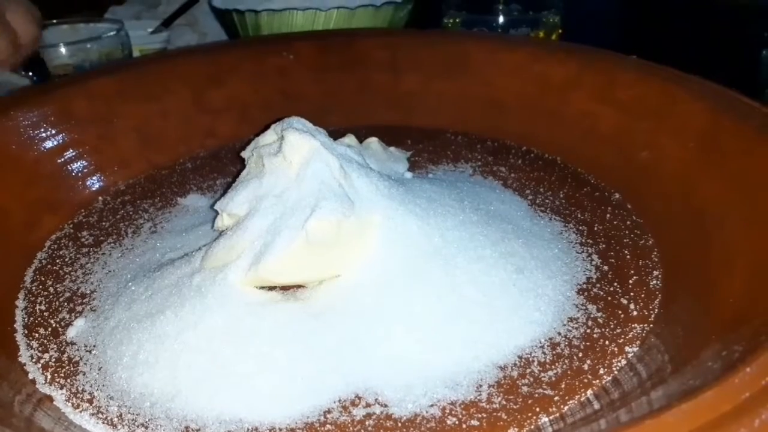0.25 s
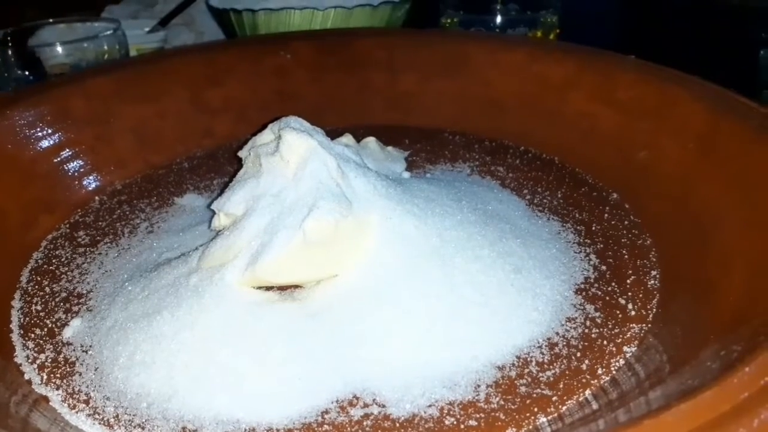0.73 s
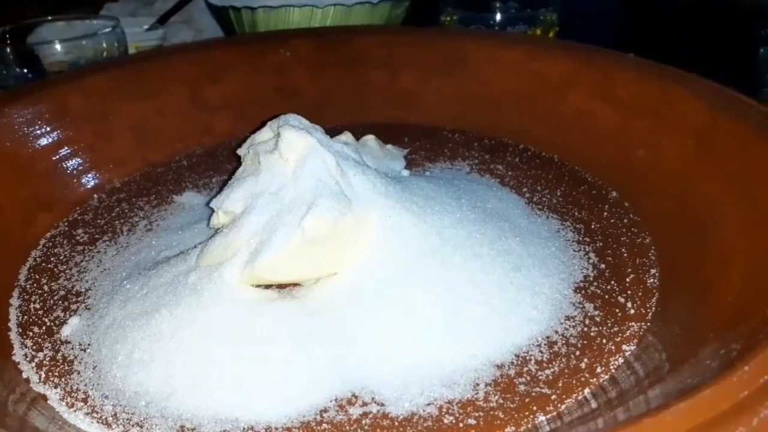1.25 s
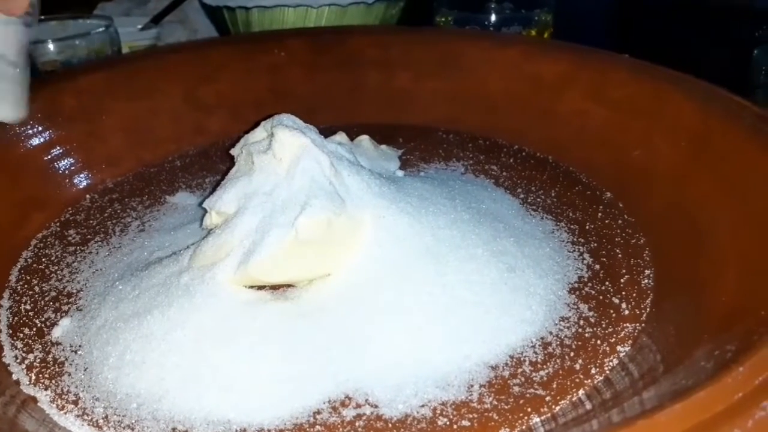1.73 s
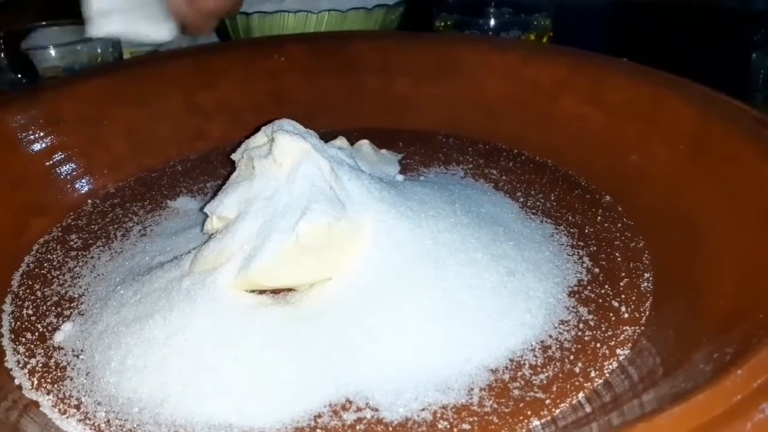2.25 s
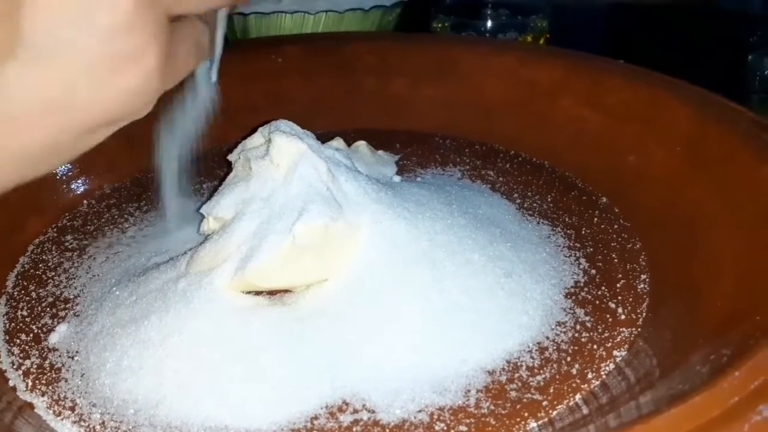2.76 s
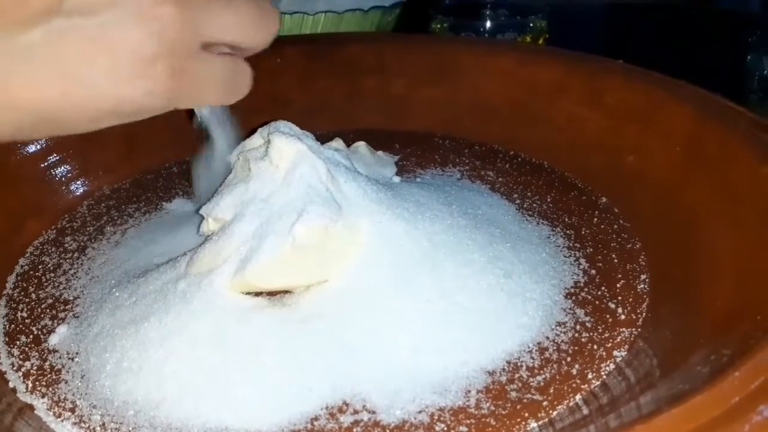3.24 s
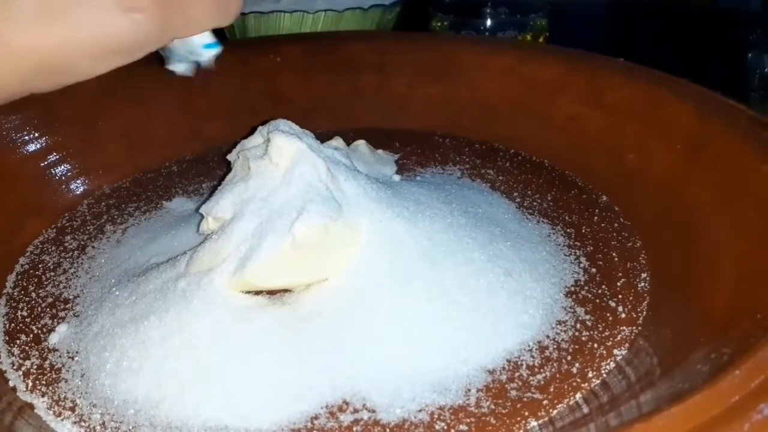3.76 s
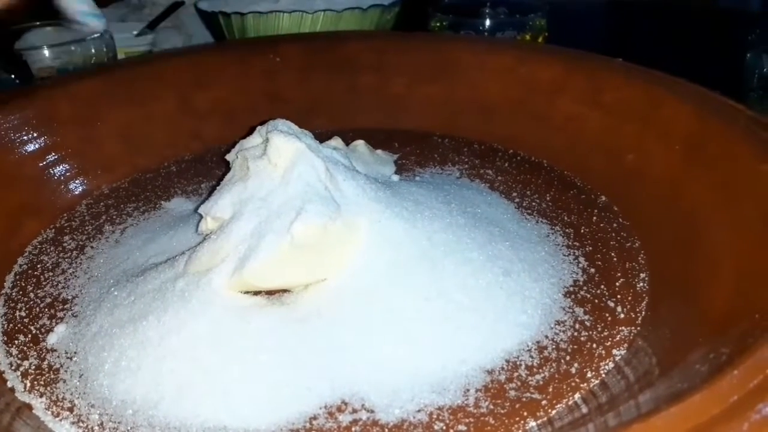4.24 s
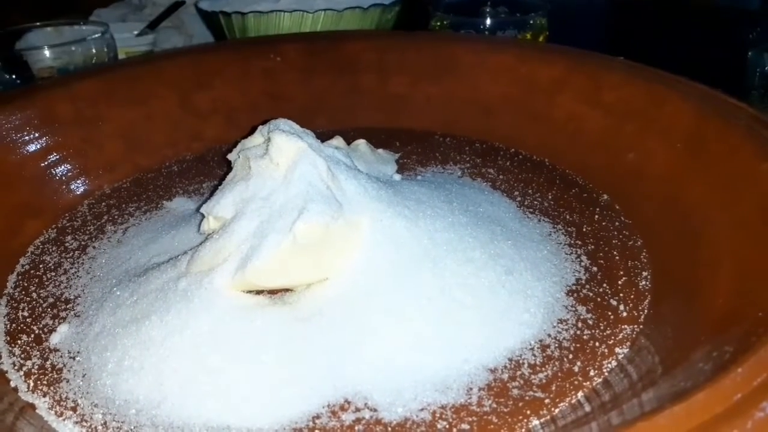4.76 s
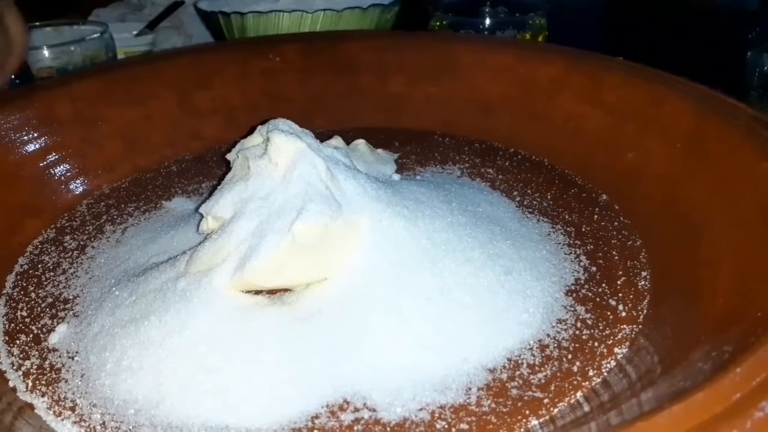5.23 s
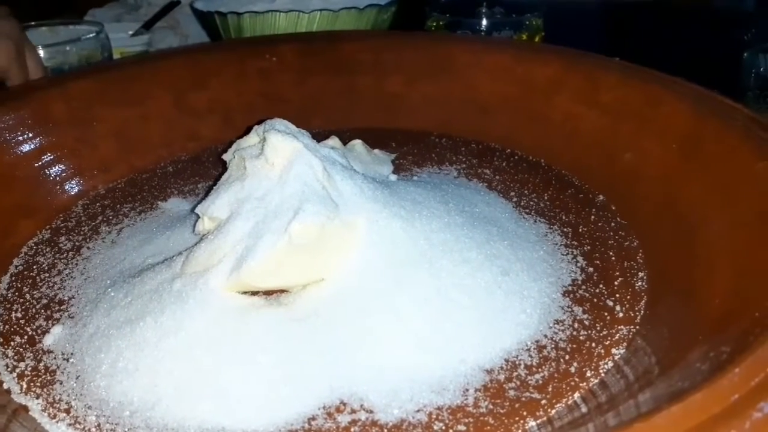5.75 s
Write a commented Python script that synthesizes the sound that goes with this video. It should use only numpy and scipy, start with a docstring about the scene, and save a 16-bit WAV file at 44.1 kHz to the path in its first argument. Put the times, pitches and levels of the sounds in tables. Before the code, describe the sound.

Small paper packets are crumpled, torn and shaken close up with sharp crackles, and powder briefly hisses out in a quiet kitchen.

```python
"""A dull rumble and a soft rustle, then sharp crackles: hands crumple, tear and shake small paper
sachets close to a phone's two microphone ports in a quiet kitchen. Breaking fibres make the rustle,
flipping creases snap, fingers knock the sachet, and midway powder hisses out over the paper.
The rumble comes and goes across the room, a faint scrape passes late, and the room rings briefly."""
import sys
import numpy as np
from scipy import signal
from scipy.io import wavfile
from scipy.ndimage import uniform_filter1d

SR = 44100
rng = np.random.default_rng(int(sys.argv[2]) if len(sys.argv) > 2 else 0)


def dump(signal):
    """Clip the signal to [-1, 1] and save it as 16-bit WAV at the path in sys.argv[1]."""
    limited = np.clip(np.atleast_2d(signal).T, -1, 1)
    pcm = np.round(limited * 32767).astype(np.int16)
    wavfile.write(sys.argv[1], SR, pcm)


N = 264149

# spectrum of the still kitchen: frequency_hz, relative_db
ROOM_TONE = [(35, -71), (60, -38), (164, 1), (323, 6.5), (822, -7.5), (2050, -3), (3500, -15), (7940, -5),
             (9790, -16), (14900, -11), (16000, -54)]
# decay of the kitchen's echoes: frequency_hz, t60_s
ROOM_DECAY = [(200, 0.22), (1000, 0.26), (3000, 0.38), (8000, 0.14), (16000, 0.05)]
# dull rumble from across the room: time_s, level_db, centre_hz, throb_db
RUMBLE = [(0.0, -59.5, 174, -73), (.15, -67, 158, -78), (.22, -82.5, 168, -84), (1.9, -79, 330, -89),
          (2.14, -59.5, 331, -80), (2.4, -78, 323, -93), (3.2, -78.5, 260, -83), (3.53, -63, 241, -77),
          (3.66, -64, 290, -83.5), (3.84, -59.5, 312, -83), (3.98, -84, 305, -92), (4.24, -74, 264, -77),
          (4.388, -61, 190, -79), (4.45, -71, 236, -94), (4.568, -65, 235, -78), (4.642, -57.5, 178, -79),
          (4.698, -59, 173, -76), (4.736, -51, 175, -95), (4.872, -56.5, 156, -70),
          (4.895, -61, 167.5, -82), (4.952, -53.5, 191, -83), (5.006, -56, 170, -55.5),
          (5.12, -73.5, 172, -71.5), (5.31, -93, 172, -78.5), (5.47, -87, 276, -83.5),
          (5.634, -56.5, 360, -77), (5.762, -74, 336, -77.5), (5.99, -75.5, 285, -91)]
# a faint narrow scrape: time_s, level_db
SCRAPE = [(4.35, -63), (4.458, -75), (4.482, -68), (4.638, -80), (4.758, -80), (4.8, -83)]
# powder running out: time_s, level_db
POURING = [(2.3, -91), (2.424, -82), (2.65, -54.5), (2.756, -59.5), (3.252, -54), (3.362, -57),
           (3.426, -58), (3.624, -87), (3.75, -69)]
# spectrum of the sliding grains: frequency_hz, relative_db
POWDER_COLOUR = [(880, -51), (1500, -14), (1850, -6), (2160, -23), (2370, -14), (4160, -6.5), (5380, -8),
                 (8000, -3), (9950, -9.5), (12500, -5), (16000, -14)]
# fingers knocking the sachet: start_s, level_db, pitch_hz
KNOCKS = [(.038, -51.5, 325), (.543, -54, 600), (.795, -55, 686), (1.188, -41.5, 1210),
          (1.364, -44.5, 1170), (1.627, -45.5, 1120), (1.867, -32, 1113), (1.966, -37.5, 380),
          (2.042, -41, 367), (2.053, -29, 446), (2.07, -33, 356), (3.056, -45.5, 1160), (3.302, -53, 332),
          (3.357, -51, 323), (3.389, -52, 436), (3.574, -45.5, 725), (3.631, -47.5, 322), (3.812, -51, 330),
          (3.849, -30.5, 1196), (4.052, -49.5, 453), (4.159, -64, 820), (4.49, -41.5, 420),
          (4.963, -42, 283), (5.598, -51.5, 314), (5.692, -52, 350)]
# colour of paper and microphone: frequency_hz, relative_db
PAPER_COLOUR = [(180, -33), (300, -3), (343, -1), (856, -7), (1140, -3), (1550, -6), (2100, -3), (3080, -3),
                (3580, -7), (4230, -2), (5340, -10), (7800, -5), (9390, -14), (12700, -8), (16000, -16)]
# how much later the right port hears each spot of the paper: delay_samples
PORT_DELAYS = [9, 11, 12, 13, 14, 16]
# moves of the hands: peak_s, effort_db, swell_s, fade_s, flap_over_effort_db, fizz_over_effort_db
HAND_MOVES = [(0.05, -73, 0.049, 0.25, 1, -4.5), (.234, -61.5, 0.022, 0.9, -26, -2.5),
              (.32, -59, 0.076, 0.14, -0.5, -22), (.53, -60, 0.12, 0.094, -7, -5),
              (.606, -63, 0.089, 0.2, 1, -4.5), (.72, -66.5, 0.27, 0.11, -3, -7.5),
              (.805, -64.5, 0.016, 0.097, 3, 0), (.888, -87, 0.11, .1, -2, 8),
              (1.146, -52.5, .003, 0.11, -6.5, -6), (1.2, -63, .04, .12, -2.5, -2),
              (1.335, -59.5, 0.025, 0.13, -5, -7), (1.368, -56, .015, 0.11, -5.5, -7),
              (1.53, -71.5, 0.048, 0.12, 3, 1), (1.632, -60, 0.026, .16, -2.5, -5),
              (1.736, -58, 0.0082, 0.061, -15, -10), (1.8, -56, 0.0197, 0.22, -17, -1.5),
              (1.884, -39.5, 0.069, 0.065, -2.5, -3.5), (1.914, -40.5, 0.034, 0.017, -9, -33),
              (1.966, -50.5, 0.0073, 0.085, 6, 9.5), (1.993, -35.5, 0.044, 0.06, -8, -12),
              (2.038, -40, 0.098, 0.092, -3.5, 0.5), (2.249, -70.5, 0.2, 0.09, 4, -2.5),
              (2.404, -74, 0.1, 0.26, -4, 6.5), (2.642, -60, 0.11, 0.1, -9.5, 5.5),
              (2.78, -58.5, .05, .15, -11, 6), (3.036, -55, 0.023, 0.19, -3.5, 4.5),
              (3.185, -52, 0.026, 0.047, -9, 7.5), (3.298, -59.5, 0.0098, 0.03, 2, -11),
              (3.358, -51, 0.013, 0.069, -3, -20), (3.507, -53.5, 0.057, 0.14, -5, -1.5),
              (3.62, -69.5, .05, 0.42, 0.5, -5.5), (3.844, -48.5, 0.028, 0.075, -6, -12),
              (3.882, -47, 0.037, 0.088, -8.5, -5), (4.03, -52, 0.093, 0.052, -7.5, -8),
              (4.186, -53.5, 0.22, 0.2, -11, -8.5), (4.163, -44.5, 0.006, 0.018, -13, -5),
              (4.332, -60, 0.14, 0.13, 0, -16), (4.488, -62, 0.02, 0.12, 3, -5),
              (4.791, -58, 0.011, .01, -11, -21), (4.801, -70.5, 0.0087, 0.35, -8, -6),
              (4.927, -63.5, .03, 0.18, -8, -14), (5.03, -72, 0.18, 0.05, 3.5, -1.5),
              (5.372, -70, 0.051, 0.16, 0.5, -4.5), (5.528, -62.5, 0.076, 0.033, -9, -13),
              (5.678, -62, 0.22, 0.13, -1, -8), (5.875, -77, 0.025, 0.18, -2, -0.5),
              (5.985, -74, .07, .1, 2, -16)]
# the main creases that snap: start_s, level_db, pitch_hz, t60_s, crack_over_ring_db
CREASES = [(.228, -52.5, 1770, 0.0093, -10), (.2358, -45, 1770, .017, -14), (.292, -33.5, 2870, 0.022, 31),
           (.307, -36, 5930, 0.013, -18), (.3194, -35.5, 4200, 0.016, 23), (.3426, -33.5, 5940, 0.013, 7),
           (.5075, -46, 3540, 0.027, 15), (.5441, -37, 7900, 0.022, 8), (.599, -49, 2270, .008, 7),
           (.608, -39.5, 2150, 0.016, -18), (.6442, -39.5, 2190, 0.0074, -13),
           (.6947, -47.5, 2270, 0.061, -6), (.7972, -36, 2220, .012, -13.5), (.829, -46, 2370, 0.021, -21),
           (.985, -55, 1389, 0.014, -3), (1.1453, -30.5, 6230, 0.019, -1.5), (1.1588, -37, 6200, .017, 0),
           (1.1914, -35.5, 2080, 0.014, -10), (1.3302, -46, 4900, .015, 6),
           (1.347, -38.5, 2580, 0.0076, 11.5), (1.3645, -33.5, 2860, 0.022, -4),
           (1.451, -55, 1125, 0.012, 0), (1.5219, -57, 1890, 0.0093, -3), (1.5347, -49.5, 1360, 0.023, 3),
           (1.627, -39.5, 2850, 0.0082, 8), (1.6367, -45, 2920, 0.052, 5), (1.6509, -34, 1850, 0.017, -5),
           (1.736, -34, 4620, 0.007, 24), (1.796, -47, 6300, .016, -7), (1.8497, -37, 6800, 0.0091, -9),
           (1.913, -24.5, 4000, 0.014, -11), (1.9632, -32, 2560, 0.036, 6), (1.9871, -22, 3140, 0.021, -7),
           (2.0214, -25.5, 2660, 0.016, 1), (2.0252, -40, 7160, 0.021, -19), (2.0332, -25, 8650, 0.02, -5),
           (2.0454, -43, 3250, 0.015, 6), (2.0704, -40, 6050, 0.0064, -15), (2.3774, -56, 7000, 0.05, 0),
           (2.4738, -51.5, 5640, 0.012, -9), (2.6, -51, 6540, 0.02, -8), (2.7464, -49, 8600, 0.035, -19),
           (3.0345, -39, 8600, .02, -4), (3.0547, -45, 6360, 0.013, 4), (3.3581, -26.5, 4400, 0.0076, -26),
           (3.465, -42, 1830, 0.014, -7), (3.489, -33.5, 6900, 0.0067, -3), (3.518, -26.5, 4140, 0.0052, 0),
           (3.5275, -50, 4220, 0.013, 4), (3.626, -42.5, 1325, 0.012, -17), (3.7186, -50, 1760, 0.021, -2),
           (3.8486, -25, 1845, 0.013, -9), (3.8604, -42, 1180, 0.03, 3), (3.8821, -22, 4040, 0.0081, 12),
           (3.8961, -48, 2360, .012, 4), (4.0042, -37, 2020, 0.025, 0), (4.0332, -37, 3400, 0.01, -29),
           (4.128, -39, 5170, .02, -2), (4.1617, -22.5, 3570, 0.0093, 36),
           (4.1735, -29.5, 1810, 0.0061, -15), (4.303, -42, 2340, 0.014, 1),
           (4.482, -43.5, 2330, 0.0082, -2), (4.338, -39.5, 1060, 0.0073, 0.5),
           (4.4896, -40, 4700, 0.012, 10), (4.7879, -40, 2590, 0.0065, 12), (4.88, -48, 6150, 0.018, 1),
           (4.9211, -47.5, 2410, 0.032, -3), (5.4793, -47.5, 1680, 0.0064, -11),
           (5.487, -46.5, 1700, 0.012, -14), (5.5154, -43, 4200, .014, 4),
           (5.6556, -46.5, 1710, 0.046, -0.5), (5.8696, -60.5, 6450, .014, -9)]

PORT_GAP_M = .07
FLAP_HZ, BODY_HZ, CRISP_HZ, FIZZ_HZ = (500, 1800), (1800, 4900), (4900, 9300), (9300, 18000)  # paper bands
MOVE_SPAN_DB, MOVE_BEND = 20, .2  # rise over swell_s and fall over fade_s; the bend steepens the far ends
BOOM_HZ, BOOM_DB, BOOM_THROB_DB = 345, -8, -23  # the sheet's boom, with levels against its flap
SNAP_FLAP_DB, SNAP_FIZZ_DB = -13, -16.5  # against the snap's core; the flap gains 1 dB per octave of pitch


def gain_of(db):
    """Decibels to a factor."""
    return 10 ** (np.asarray(db) / 20)


def unit_rms(x):
    """Scales to rms 1."""
    return x / np.sqrt(np.mean(x ** 2) + 1e-20)


def value_at(points, hz):
    """Reads a table on a log-frequency axis."""
    f, value = np.transpose(points)
    return np.interp(np.log(hz + 1), np.log(f + 1), value)


def curves(rows):
    """Columns of a timed table at every sample."""
    time_s, *columns = np.transpose(rows)
    return [np.interp(np.arange(N) / SR, time_s, column) for column in columns]


def band(x, lo_hz, hi_hz):
    """Causal band-pass along time."""
    sos = signal.butter(3, [lo_hz, min(hi_hz, .49 * SR)], "bandpass", fs=SR, output="sos")
    return signal.sosfilt(sos, x)


def colour(x, spectrum):
    """Minimum-phase filter with the gain of a spectrum."""
    hz = abs(np.fft.fftfreq(4096, 1 / SR))
    log_gain = np.log(gain_of(np.maximum(value_at(spectrum, hz), -60)))
    taps = np.fft.ifft(np.exp(np.conj(signal.hilbert(log_gain)))).real[:2048]
    return signal.oaconvolve(x, taps[None], axes=1)[:, :x.shape[1]]


def resonate(x, hz, widths_hz):
    """One resonance per width, in series: each shifts hz down to zero, smooths, and shifts back."""
    turn = np.exp(2j * np.pi * np.cumsum(hz * np.ones(len(x))) / SR)
    for width_hz in widths_hz:
        pole = np.exp(-np.pi * width_hz / SR)
        x = 2 * (turn * signal.lfilter([1 - pole], [1, -pole], x / turn)).real
    return x


def diffuse(shape_db=lambda hz, t: 0, size=N):
    """Noise from all sides at the two ports: alike in the bass, unrelated in the treble."""
    frames, hz = size // 128 + 5, np.fft.rfftfreq(512, 1 / SR)[:, None]
    a, b, c, d = rng.standard_normal((frames, 257, 4)).T
    coherence = np.sinc(2 * hz * PORT_GAP_M / 343)
    left = a + 1j * b
    right = coherence * left + np.sqrt(1 - coherence ** 2) * (c + 1j * d)
    spectra = np.array([left, right]) * gain_of(shape_db(hz, np.arange(frames) * 128 / SR))
    return unit_rms(signal.istft(spectra, nperseg=512, noverlap=384)[1][:, :size])


def hand_effort():
    """Levels in dB of the paper's body, flap, crisp edge and fizz: the moves add up as powers."""
    peak_s, effort_db, swell_s, fade_s, flap_db, fizz_db = np.array(HAND_MOVES).T[:, :, None]
    t = np.arange(0, N, 40) / SR
    away = np.maximum((peak_s - t) / swell_s, (t - peak_s) / fade_s)
    move_db = effort_db - MOVE_SPAN_DB * ((1 - MOVE_BEND) * away + MOVE_BEND * away ** 3)
    crisp_db = 4.5 + .59 * fizz_db
    powers = [(gain_of(move_db + db) ** 2).sum(0) for db in (0, flap_db, crisp_db, fizz_db)]
    return [np.interp(np.arange(N) / SR, t, 10 * np.log10(power + 1e-14)) for power in powers]


def room_tone():
    """The quiet kitchen, plus a deep flutter, unrelated at the two ports, that stirs as the hands move."""
    flutter_db = -53 + .53 * uniform_filter1d(hand_effort()[0], 1500)
    flutter = unit_rms(band(rng.standard_normal((2, N)), 25, 75))
    still = gain_of(-75.5) * diffuse(lambda hz, t: value_at(ROOM_TONE, hz))
    return still + gain_of(flutter_db) * flutter


def rumble():
    """Distant low noise in a wandering resonance over a deeper throb; the flapping sheet feeds both."""
    far_db, far_hz, throb_db = curves(RUMBLE)
    flap = gain_of(uniform_filter1d(hand_effort()[1], 900))
    far_power, boom_power = gain_of(far_db) ** 2, (gain_of(BOOM_DB) * flap) ** 2
    power = far_power + boom_power
    centre_hz = (far_power * far_hz + boom_power * BOOM_HZ) / power
    noise = diffuse() + .3 * rng.standard_normal((2, N))
    low = unit_rms(np.array([resonate(port, centre_hz, widths_hz=(75, 170, 260)) for port in noise]))
    throb = unit_rms(band(noise, 81, 161))
    throb_gain = np.hypot(gain_of(throb_db), gain_of(BOOM_THROB_DB) * flap)
    return gain_of([[-2.2], [2.2]]) * (np.sqrt(power) * low + throb_gain * throb)  # stronger on the right


def scrape(centre_hz=2110):
    """A faint scrape: noise in one narrow band that fades in and out."""
    level_db, = curves([(SCRAPE[0][0] - .05, -120), *SCRAPE, (SCRAPE[-1][0] + .042, -120)])
    return gain_of(level_db) * unit_rms(band(diffuse(), centre_hz - 170, centre_hz + 170))


def kitchen_echoes(x):
    """The room answers with a few early echoes and a short diffuse tail whose top treble dies first."""
    tail = diffuse(lambda hz, t: -60 * t / value_at(ROOM_DECAY, hz), size=SR // 2)
    tail *= np.clip(np.arange(SR // 2) / (.004 * SR), 0, 1)
    tail /= np.linalg.norm(tail[0])
    tail[[[0], [1]], rng.integers(60, 900, (2, 7))] += .12  # seven early echoes at each port
    return signal.fftconvolve(x[None], tail, axes=1)[:, :N]


def crackle(per_s, spread_db, clump_db):
    """Tiny clicks, a few of them large, from random spots of the paper; the left port hears them first."""
    size = gain_of(spread_db * np.minimum(rng.exponential(1, N), 5)) * rng.choice([-1., 1.], N)
    clumps = unit_rms(band(rng.standard_normal(N), 42, 110))
    clicks = size * (rng.random(N) < per_s / SR) * gain_of(clump_db * clumps)
    delays = rng.choice(PORT_DELAYS, N)
    return np.array([clicks, sum(np.roll(clicks * (delays == lag), lag) for lag in PORT_DELAYS)])


def powder():
    """Countless fine grains slide over the paper and land: an even hiss."""
    level_db, = curves(POURING)
    t = np.arange(N) / SR
    running = (t > POURING[0][0]) & (t < POURING[-1][0])
    grains = crackle(per_s=30000, spread_db=3, clump_db=.4)
    return running * gain_of(level_db) * unit_rms(colour(grains, POWDER_COLOUR))


def finger_knocks(t60_s=.012, attack_s=.0018):
    """Each knock is a soft push that rings the filled sachet for a few cycles."""
    out, t = np.zeros(N + 3000), np.arange(3000) / SR
    for start_s, level_db, pitch_hz in KNOCKS:
        ring = np.sin(2 * np.pi * pitch_hz * t) * gain_of(-60 * t / t60_s) * np.minimum(t / attack_s, 1)
        at = round(start_s * SR)
        out[at:at + 3000] += gain_of(level_db) * ring / abs(ring).max()
    left = band(out[:N], 165, 3300)  # a small sachet radiates no deep bass
    return np.array([left, np.roll(left, max(PORT_DELAYS))])


def rustle():
    """Breaking fibres excite four bands of the sheet, each as loud as the hands drive it."""
    sheet = colour(crackle(per_s=6100, spread_db=3, clump_db=0), PAPER_COLOUR)
    bands = zip(hand_effort(), (BODY_HZ, FLAP_HZ, CRISP_HZ, FIZZ_HZ))
    return sum(gain_of(db) * unit_rms(band(sheet, *edges_hz)) for db, edges_hz in bands)


def small_creases(count, over_effort_db=8, spread_db=2.5, t60_s=.012, crack_db=8):
    """Crease rows at random moments and pitches, as strong as the hands work."""
    when, size, pitch = rng.random((count, 3)).T
    level_db = hand_effort()[0][(when * N).astype(int)] + over_effort_db - spread_db * np.log(1 - size)
    return [(*row, t60_s, crack_db) for row in zip(when * N / SR, level_db, 1500 * 5 ** pitch)]


def crease_snaps():
    """A crease flips close to the microphone: a brief burst that rings the nearby patch of paper."""
    out, t = np.zeros((2, N + 1000)), np.arange(900) / SR
    rows = CREASES + small_creases(count=60)
    t60_s = np.array(rows)[:, [3]]
    envelopes = gain_of(-60 * t / t60_s) * np.minimum(t / (.12 * t60_s), 1)
    bursts = colour(rng.standard_normal((len(rows), 900)) * envelopes, PAPER_COLOUR)
    for (start_s, level_db, pitch_hz, _, crack_db), burst in zip(rows, bursts):
        ring = unit_rms(resonate(burst, pitch_hz, widths_hz=[.25 * pitch_hz] * 2))
        crack = gain_of(crack_db) * unit_rms(band(burst, BODY_HZ[0], CRISP_HZ[1]))
        core = unit_rms(ring + crack)
        flap = gain_of(SNAP_FLAP_DB + np.log2(pitch_hz / BODY_HZ[0])) * unit_rms(band(burst, *FLAP_HZ))
        fizz = gain_of(SNAP_FIZZ_DB) * unit_rms(band(burst, *FIZZ_HZ))
        snap = (core + flap + fizz) * gain_of(level_db) / abs(core).max()
        at, lag = round(start_s * SR), rng.choice(PORT_DELAYS)
        left_over_right_db = rng.normal(-6, 2)
        out[0, at:at + 900] += gain_of(left_over_right_db / 2) * snap
        out[1, at + lag:at + lag + 900] += gain_of(-left_over_right_db / 2) * snap
    return out[:, :N]


def scene():
    """Paper up close, kitchen behind; the echoes crossfade steadily among three tails, a shifting ring."""
    knocks = finger_knocks()
    paper = crease_snaps() + (rustle() + powder() + knocks) * gain_of([[-.4], [.4]])
    crossfade_hz, echo_db = 5.5, -7
    phase = 2 * np.pi * (crossfade_hz * np.arange(N) / SR + np.arange(3)[:, None] / 3)
    shares = np.sqrt((1 + np.cos(phase)) / 3)  # squares sum to one
    echoes = sum(kitchen_echoes(paper[0] * share) for share in shares)
    return paper + gain_of(echo_db) * echoes + rumble() + scrape() + room_tone()


def record(dry):
    """The phone cuts the treble above 16 kHz."""
    return signal.oaconvolve(dry, signal.firwin(301, 16000, window=("kaiser", 9), fs=SR)[None], "same")


dry = scene()
out = record(dry)
dump(out)
```